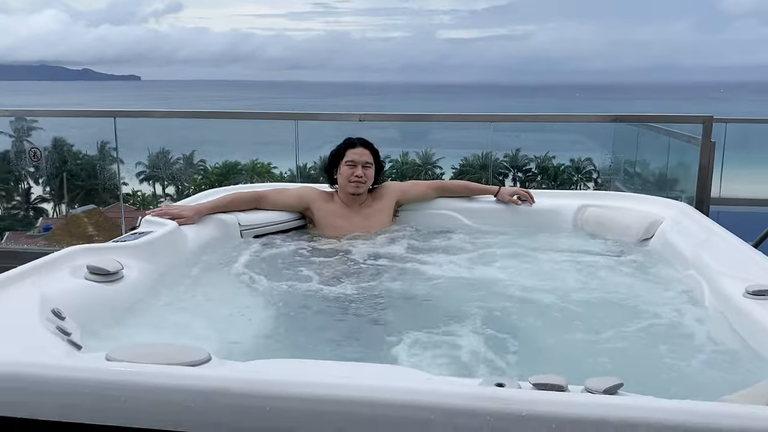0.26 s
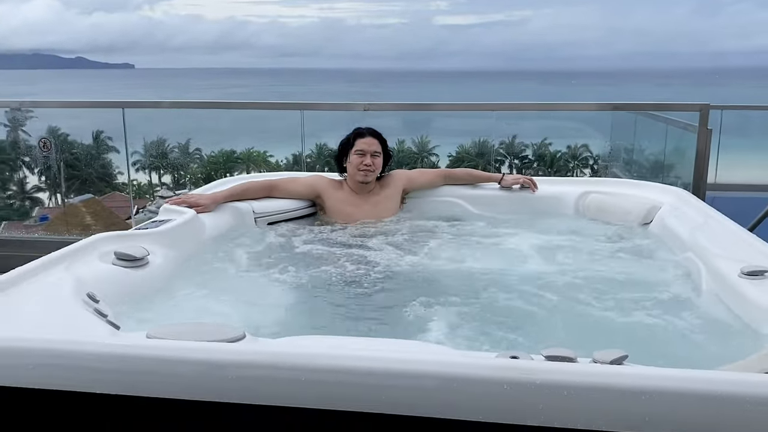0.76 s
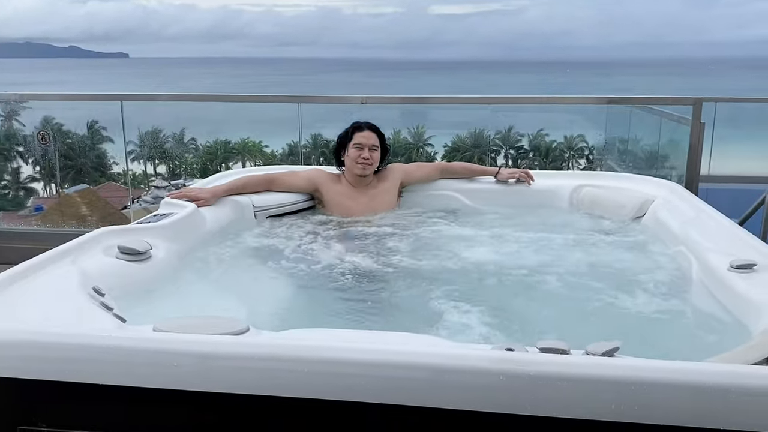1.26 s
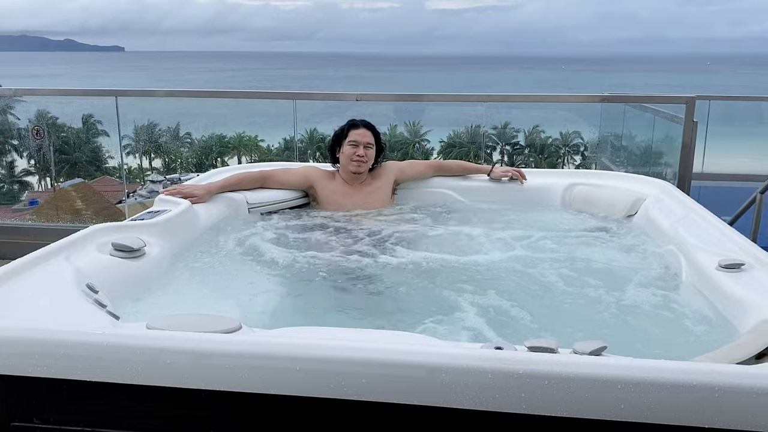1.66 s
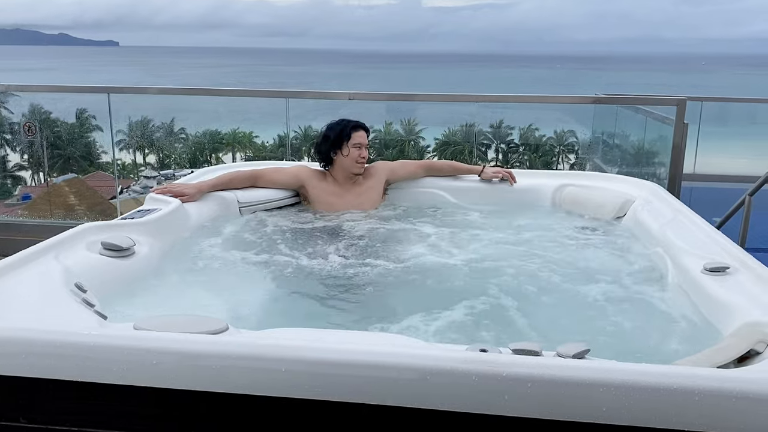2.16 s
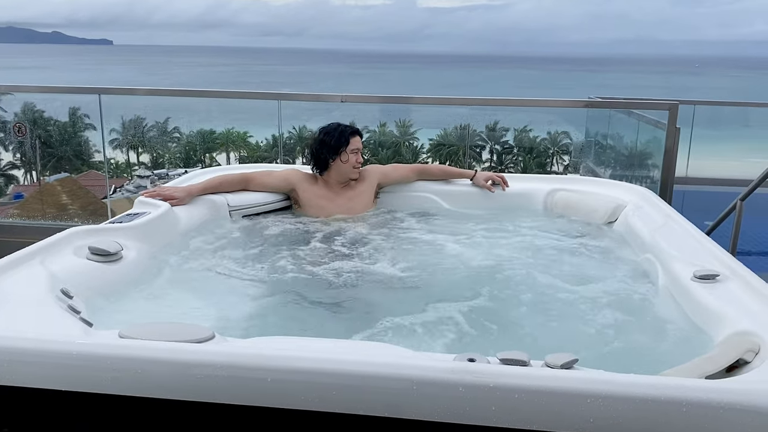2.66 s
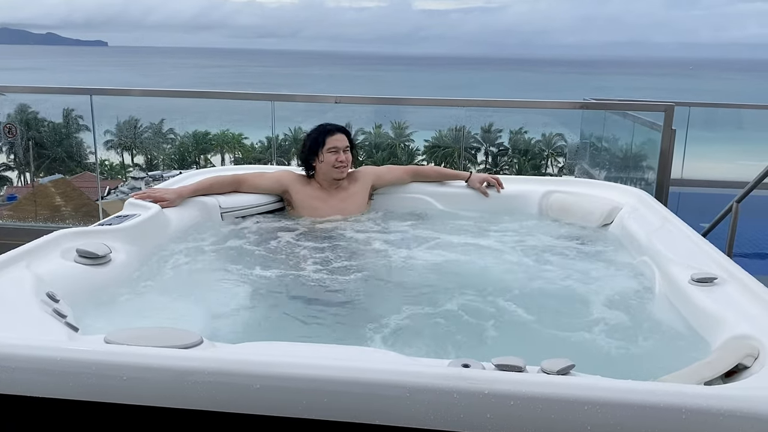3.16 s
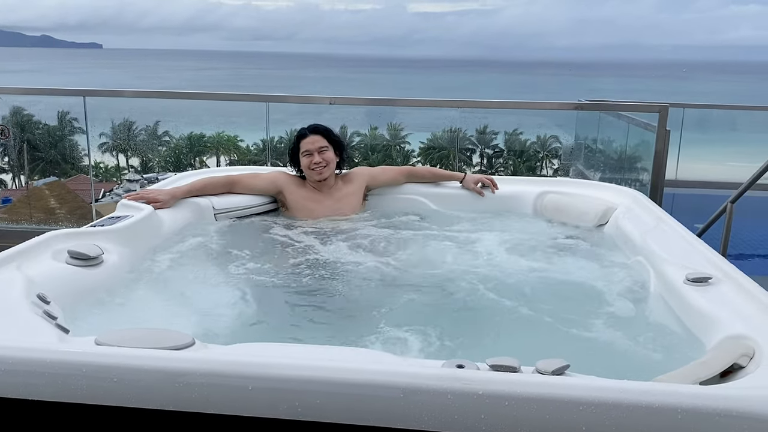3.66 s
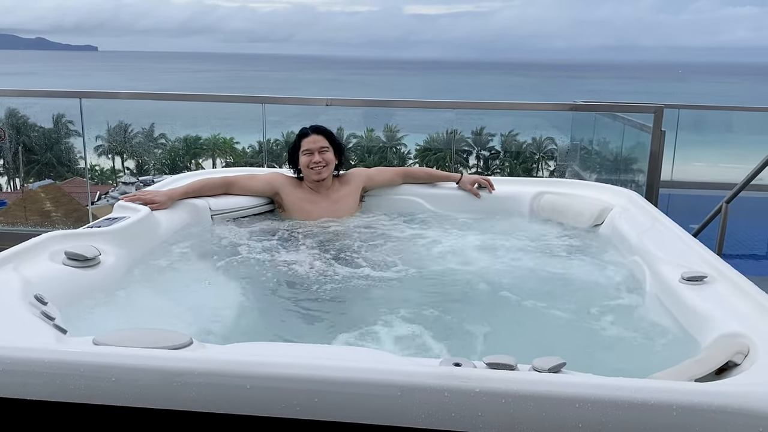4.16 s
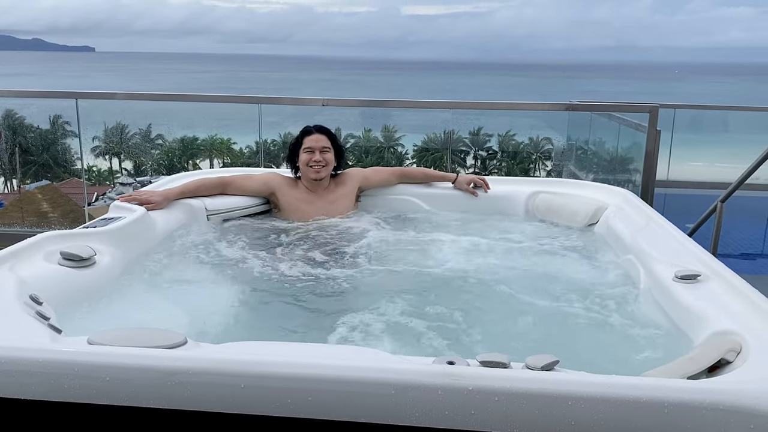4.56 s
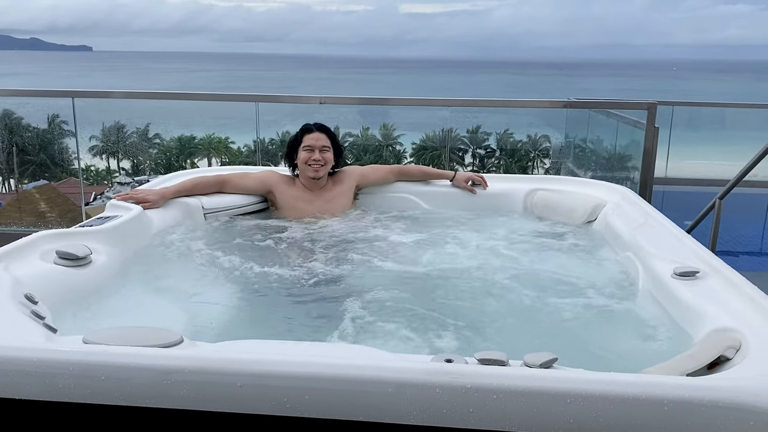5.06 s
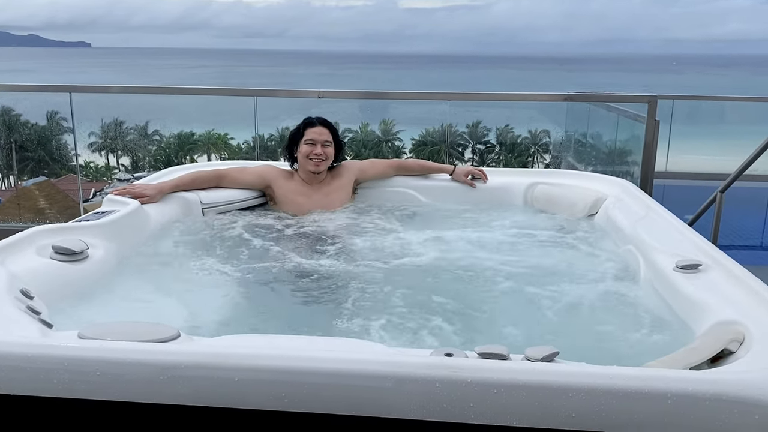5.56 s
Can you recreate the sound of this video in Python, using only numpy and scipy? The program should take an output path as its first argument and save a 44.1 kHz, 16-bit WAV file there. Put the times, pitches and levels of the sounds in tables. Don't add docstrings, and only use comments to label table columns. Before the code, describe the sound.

A bubbling spa tub rushes and gurgles continuously above a deep electric hum, while a distant engine revs faintly and briefly midway.

```python
import sys
import numpy as np
from scipy import signal
from scipy.fft import rfft, irfft, next_fast_len
from scipy.io import wavfile

SR = 44100
rng = np.random.default_rng(int(sys.argv[2]) if len(sys.argv) > 2 else 0)


def elevation(decibels):
    levels = np.asarray(decibels, float)
    return 10 ** (levels / 20)


def dump_mix(stems):
    frames = np.atleast_2d(stems).T
    limited = np.clip(frames, -1, 1)
    pcm = np.round(limited * 32767).astype(np.int16)
    wavfile.write(sys.argv[1], SR, pcm)


N = 255780
T = np.arange(N) / SR
SIZE = next_fast_len(N)
HZ = np.maximum(np.arange(SIZE // 2 + 1) * SR / SIZE, 1)
LOW_LAG_S = .00026

# (time [s], level about the mean [dB])
AIR_DRAWN = [(0, 1), (.3, 0), (.7, .5), (1.0, -0.5), (1.3, -0.5), (1.7, 2.5), (1.95, -4), (2.3, 0.5),
             (2.6, -3.5), (2.9, -1), (3.2, -0.5), (3.5, 2), (3.75, -1), (4.1, -0.5), (4.35, .5), (4.9, 0),
             (5.3, -0.5), (5.8, 1)]


def rms_one(x):
    return x / np.sqrt(np.mean(x ** 2) + 1e-20)


def in_time(rows):
    s, *columns = np.transpose(rows)
    return [np.interp(T, s, c) for c in columns]


def on_hz(points, hz=HZ):
    at, *columns = np.transpose(points)
    return [np.interp(np.log(hz), np.log(at), c) for c in columns]


def drift(rate_hz):
    r = np.exp(-80 * np.pi * rate_hz / SR)
    slow = signal.lfilter([1], [1, -2 * r, r * r], rng.standard_normal(N // 40 + 2002))[2000:]
    return np.interp(np.arange(N) / 40, np.arange(len(slow)), rms_one(slow))


def held(start_s, end_s, rise_s, fall_s):
    return np.clip(np.minimum((T - start_s) / rise_s, (end_s - T) / fall_s), 0, 1)


def ring(clicks, hz, t60_s):
    r = elevation(-60 / (t60_s * SR))
    w = 2 * np.pi * hz / SR
    return signal.lfilter([0, np.sin(w)], [1, -2 * r * np.cos(w), r * r], clicks + 1e-18)


def tone(hz, rms_db):
    cycles = np.cumsum(hz) / SR + rng.random()
    return np.sqrt(2) * elevation(rms_db) * np.sin(2 * np.pi * cycles)


def placed(x, left_db, lag_s=LOW_LAG_S):
    late = np.interp(T - lag_s, T, x)
    return np.array([x * elevation(left_db / 2), late * elevation(-left_db / 2)])


def patchy(white, spectrum, centres_hz, swell_db, shared_db, own_db, rate_hz):
    coloured = rfft(white, SIZE) * elevation(on_hz(spectrum)[0])
    place = np.interp(np.log(HZ), np.log(centres_hz), np.arange(len(centres_hz)))
    together = drift(rate_hz)
    out = 0
    for k, hz in enumerate(centres_hz):
        band = irfft(coloured * np.clip(1 - abs(place - k), 0, 1), SIZE)[:, :N]
        flicker_db = shared_db * together + own_db * drift(1.3 * rate_hz)
        out = out + band * elevation(swell_db(hz) + flicker_db)
    return rms_one(out)


def pump():
    # (time [s], level [dB])
    hum_level = [(0.0, -26.5), (0.2, -26.5), (0.6, -29), (1.0, -29.5), (1.2, -26), (1.8, -26.5),
                 (2.0, -30.5), (2.2, -29.5), (2.6, -30), (3.2, -27.5), (3.4, -26.5), (3.6, -26),
                 (3.8, -27.5), (4.0, -28.5), (4.2, -27), (5.0, -26), (5.2, -27), (5.8, -29)]
    # (multiple of the hum [1], level below the hum [dB])
    hum_overtones = [(2, -17.5), (3, -31)]
    hum_db, = in_time(hum_level)
    hum_hz = 119.78 + 0.097 * drift(1.27)
    hum = tone(hum_hz, hum_db + 0.16 * drift(5.1))
    overtones = sum(tone(order * hum_hz, hum_db + db + 1.3 * drift(5.3)) for order, db in hum_overtones)

    vane_hz, vane_width_hz, vane_db = 581., 5., -52.
    vane = elevation(vane_db) * rms_one(ring(rng.standard_normal(N), vane_hz, 2.2 / vane_width_hz))

    thrum_hz, thrum_db = 58.5, -34.4
    loaded = held(start_s=2.41, end_s=3.21, rise_s=.23, fall_s=.11)
    thrum = loaded * tone(np.full(N, thrum_hz), thrum_db)

    shell_hz, shell_width_hz, shell_db = 96.6, 5.9, -42.5
    shell = ring(rng.standard_normal(N), shell_hz, 2.2 / shell_width_hz)
    shell = rms_one(ring(shell, shell_hz, .04))
    boom = elevation(shell_db + in_time(AIR_DRAWN)[0]) * shell
    return placed(hum + boom, .8) + placed(overtones + thrum, .3, LOW_LAG_S / 2) + placed(vane, 2.2)


def churn(vigour_db):
    # (frequency [Hz], level per Hz [dB])
    churn_spectrum = [(28, -47), (50, -3.5), (65, -1.5), (98, 1), (150, -2.5), (280, -4), (400, -11),
                      (700, -14.5), (1050, -18.5), (1500, -20.5), (2200, -25.5), (3000, -29.5), (5200, -34),
                      (7000, -36.5), (12000, -25.5)]
    water_centres_hz = [85, 280, 1400, 3500]
    surge_spreads_db = [0.1, -0.3, 0.3]
    # (time [s], level about the mean [dB])
    froth_level = [(0, 0), (.27, 1.8), (.7, -0.4), (1.2, -0.1), (1.65, 1.5), (1.95, -1), (2.2, -0.8),
                   (2.5, -3.5), (2.75, -1), (3.1, 0), (3.4, 1.1), (3.75, 0), (4.1, -0.8), (4.35, 1.2),
                   (4.7, 0.2), (4.92, 1.5), (5.15, 0), (5.8, -0.5)]
    # (time [s], level about the mean [dB])
    spray_level = [(0, 1), (.3, 1.5), (.6, 0), (1.3, 0), (1.75, -0.6), (2.1, .7), (2.5, -1.7), (3.0, -1),
                   (3.45, 1), (3.7, 0), (3.9, .8), (4.2, 0.5), (4.6, 0), (5.0, 0.8), (5.4, -.2),
                   (5.8, -1.5)]
    # (frequency [Hz], likeness [0-1], right phase [rad], left louder by [dB])
    port_response = [(40, .99, -.05, .1), (110, .99, -.15, .6), (350, .95, -.17, -.2),
                     (600, .76, -.35, 2.2), (900, .66, -.3, 4.6), (1180, .33, -.3, 3.6),
                     (1400, .68, 1.2, 3.), (1600, .6, .8, .6), (1900, .78, .8, 3.3), (2250, .84, -.1, 3.6),
                     (3000, .74, -1., 4.3), (4200, .62, -.7, 4.), (5500, .6, -.8, 4.5)]
    churn_db, bubble_db, surges_hz = -31.5, -13., 7.8
    steady_swells_db = [in_time(AIR_DRAWN)[0] - 1.7,
                        0.6 * vigour_db,
                        in_time(froth_level)[0] - 1.9]
    swells_db = [steady + spread * drift(surges_hz)
                 for steady, spread in zip(steady_swells_db, surge_spreads_db)]
    swells_db.append(in_time(spray_level)[0] - 1.9)

    def swell_db(hz):
        shares = [np.interp(np.log(hz), np.log(water_centres_hz), one) for one in np.eye(len(swells_db))]
        return sum(share * swell for share, swell in zip(shares, swells_db))

    white = rng.standard_normal((2, N))
    pops = elevation(bubble_db) * bubbles()
    white += [pops, np.roll(pops, N // 2)]
    pair = elevation(churn_db) * patchy(white, churn_spectrum, np.geomspace(45, 6000, 15), swell_db,
                                  shared_db=-0.5, own_db=0.5, rate_hz=23.0)
    near = rfft(pair[0] + plops() + gurgles(), SIZE)
    other = rfft(pair[1], SIZE)
    alike, phase_rad, left_db = on_hz(port_response)
    alike = np.clip(alike, 0, 1)
    right = alike * np.exp(1j * phase_rad) * near + np.sqrt(1 - alike ** 2) * other

    muffling = 1 / (1 + (HZ / 7300) ** 8)
    echo_s, echo_share, echo_from_hz = 0.002046, 0.12, 580
    echo = echo_share * np.exp(-2j * np.pi * HZ * echo_s) / (1 + (echo_from_hz / HZ) ** 4)
    path = muffling * (1 - echo)
    return irfft(path * [near * elevation(left_db / 2), right * elevation(-left_db / 2)], SIZE)[:, :N]


def bubbles():
    bubbles_per_s = 1900.
    sizes = elevation(2.5 * np.minimum(rng.exponential(1, N), 4)) * rng.choice([-1, 1], N)
    born = rng.random(N) < bubbles_per_s * elevation(.8 * drift(5.)) / SR
    pitch_index = rng.integers(0, 24, N)
    out = 0
    for k, hz in enumerate(np.geomspace(300, 2300, 24)):
        clicks = sizes * born * (pitch_index == k)
        soft = ring(ring(clicks, hz, 4.2 / hz), hz, 29.0 / hz)
        out = out + np.sqrt(hz) * rms_one(soft)
    return rms_one(out)


def plops():
    # (time [s], peak level [dB], pitch [Hz])
    plop_events = [(0.184, -40.0, 852), (0.237, -46.0, 2190), (0.058, -46.0, 1850), (4.27, -43.5, 1250),
                   (4.795, -40.0, 930), (4.8, -43.0, 1200), (4.9, -43.0, 1390), (4.535, -47.0, 1700),
                   (3.41, -46.0, 2000), (1.095, -41.0, 787), (1.719, -44.0, 1082), (3.877, -38.0, 572),
                   (4.215, -38.0, 698), (4.438, -37.0, 756), (4.558, -39.0, 550), (5.062, -44.0, 1321),
                   (1.525, -42.0, 1120), (4.378, -40.0, 713), (5.396, -42.0, 729), (5.461, -36.5, 568)]
    out = np.zeros(N + 4000)
    t = np.arange(4000) / SR
    swell = np.minimum(t / .003, 1)
    decay = elevation(-60 * np.maximum(t - .012, 0) / .05)
    for s, db, hz in plop_events:
        cycles = hz * (.985 * t + .5 * t * t)
        out[round(s * SR):][:4000] += elevation(db + 1.5) * swell * decay * np.sin(2 * np.pi * cycles)
    return out[:N]


def gurgles():
    # (middle time [s], rms level [dB], pitch [Hz])
    gurgle_events = [(0.17, -38.5, 186), (0.3, -45, 784), (0.49, -48, 706), (0.579, -40, 278),
                     (0.62, -43.5, 650), (1.061, -44, 470), (1.281, -39, 303), (1.53, -53, 540),
                     (1.699, -41.5, 336), (4.24, -42, 400), (4.26, -42.5, 205), (5.7, -42.5, 289),
                     (0.8, -44, 261), (2.14, -43, 266), (2.199, -43, 321), (3.01, -41, 440),
                     (3.28, -46, 588), (3.33, -44, 286), (3.46, -42.5, 276), (3.69, -40, 296),
                     (3.859, -39.5, 296), (4.049, -40.5, 306), (4.201, -41, 160), (4.441, -53, 164),
                     (4.53, -43, 380), (4.639, -41, 195), (4.78, -51, 940), (4.95, -43, 287),
                     (5.009, -39.5, 246), (5.11, -49, 560), (5.15, -44, 488), (5.3, -41, 505),
                     (5.42, -52, 980), (5.47, -69, 555), (5.52, -40, 385), (5.58, -48, 513)]
    length_cycles, rise_share = 45., .04
    out = np.zeros(N)
    for s, db, hz in gurgle_events:
        length_s = length_cycles / hz
        sounding = abs(T - s) < length_s / 2
        t = T[sounding] - s
        cycles = hz * t * (1 + rise_share * t / length_s / 2)
        out[sounding] += np.sqrt(2) * elevation(db) * np.cos(np.pi * t / length_s) * np.sin(2 * np.pi * cycles)
    return out


def fizz(level_db):
    # (frequency [Hz], level per Hz [dB])
    fizz_spectrum = [(3000, 0), (5000, -11.5), (6500, -2.5), (8200, 2.5), (10500, 1), (12500, -2),
                     (15700, -3)]
    # (time [s], peak level [dB])
    splash_events = [(0.237, -50.5), (0.376, -51.5), (1.27, -51.1), (1.481, -51.5), (1.865, -51.3),
                     (1.983, -47.4), (2.039, -50.3), (2.423, -52.0), (3.166, -49.5), (3.505, -50.9),
                     (4.36, -50.0), (5.05, -48.5), (5.3, -49.8), (5.443, -51.9)]
    # (frequency [Hz], phase [turns], likeness [0-1])
    right_lead = [(3200, 1, .9), (6700, 2, .9), (8460, 2.5, .987), (10030, 3, .985), (12070, 3.5, .982),
                  (14060, 4, .985), (15640, 4.5, .985)]
    bursts = np.zeros(N)
    for s, db in splash_events:
        bursts[round(s * SR)] = elevation(2 * (db + 48.6))
    burst_s = .014
    bursts = signal.fftconvolve(bursts, np.hanning(round(burst_s * SR)))[:N]
    hiss = patchy(rng.standard_normal((2, N)), fizz_spectrum, np.geomspace(4500, 14000, 5), lambda hz: 0,
                  shared_db=0.76, own_db=0.66, rate_hz=12.0)
    near, other = rfft(hiss * elevation(level_db + 5.5) * (1 + bursts), SIZE)
    turns, alike = on_hz(right_lead)
    right = alike * np.exp(2j * np.pi * turns) * near + np.sqrt(1 - alike ** 2) * other
    return irfft(np.array([near, right]), SIZE)[:, :N]


def engine():
    # (frequency [Hz], level [dB])
    exhaust_lines = [(141, -39.5), (259.5, -36)]
    start_s, climb_s, end_s = 2.2, 2.48, 2.78
    climb_per_s = .25
    speed = 1 + climb_per_s * np.clip(T - climb_s, 0, end_s - climb_s)
    lines = sum(tone(hz * speed, db + 0.36 * drift(15.0)) for hz, db in exhaust_lines)
    return placed(held(start_s, end_s, rise_s=.05, fall_s=.06) * lines, left_db=-0.5)


def scene():
    # (time [s], level about the mean [dB])
    jet_vigour = [(0.0, 0.5), (0.27, -2), (0.8, -2.5), (1.2, -3), (1.7, -1.5), (2.1, -3.2), (2.5, -6),
                  (2.8, -4.5), (3.1, -2), (3.45, -3), (3.7, -1), (4.1, -2.5), (4.4, -2), (4.85, -1.5),
                  (5.1, -3), (5.5, -1.5), (5.8, -5)]
    # (time [s], level about the mean [dB])
    foam_thickness = [(0, 0), (.6, -0.5), (1.1, 0), (1.6, 0), (2.2, -1), (2.8, -1.2), (3.6, -1.5),
                      (4.2, -0.5), (4.9, -1.8), (5.1, -1), (5.8, -0.5)]
    vigour_db, = in_time(jet_vigour)
    fizz_db = -54.5 + 0.25 * vigour_db + in_time(foam_thickness)[0]
    return pump() + churn(vigour_db) + fizz(fizz_db) + engine()


def low_pass(x):
    return signal.sosfilt(signal.butter(12, 15740, fs=SR, output="sos"), x)


def record(dry):
    low_cut = signal.butter(2, 40, "high", fs=SR, output="sos")
    mix = signal.sosfilt(low_cut, dry)
    return low_pass(mix)


dry = scene()
out = record(dry)
dump_mix(out)
```